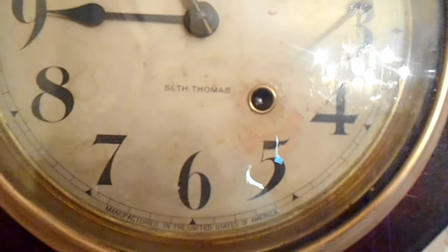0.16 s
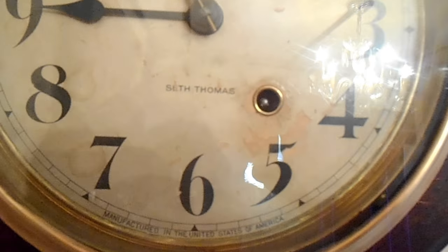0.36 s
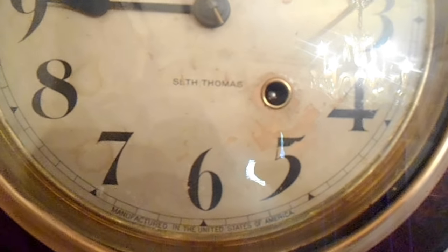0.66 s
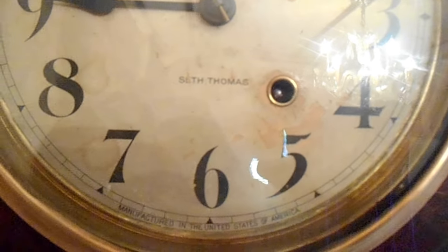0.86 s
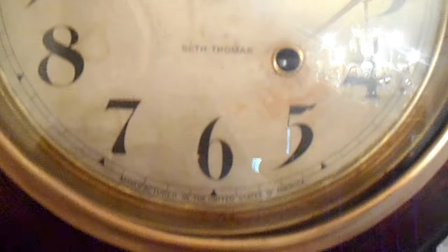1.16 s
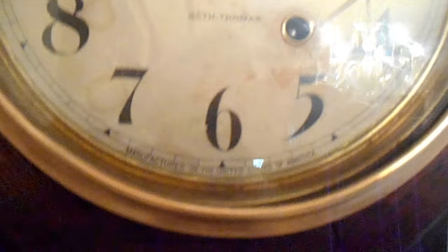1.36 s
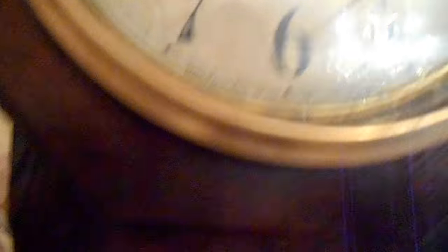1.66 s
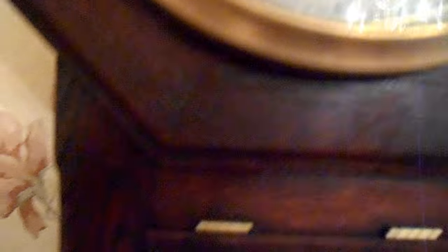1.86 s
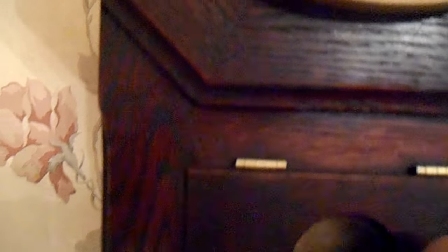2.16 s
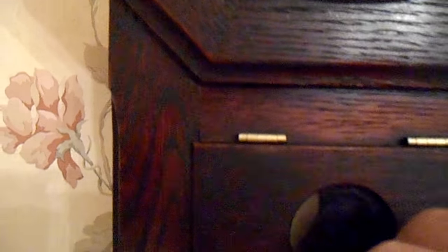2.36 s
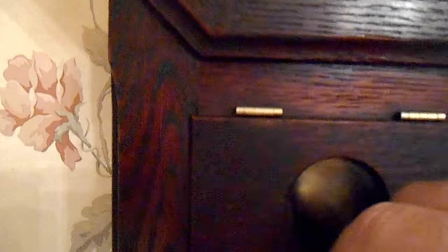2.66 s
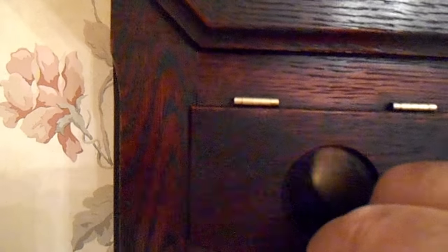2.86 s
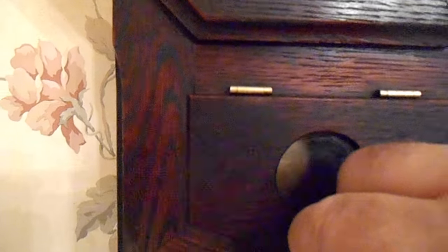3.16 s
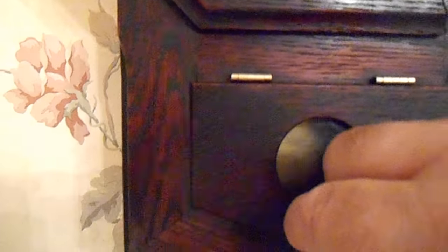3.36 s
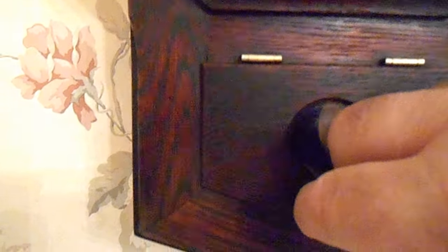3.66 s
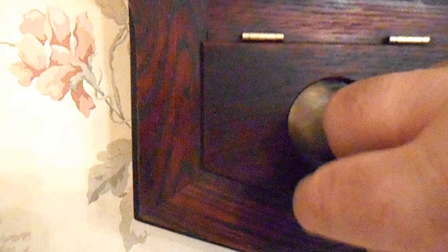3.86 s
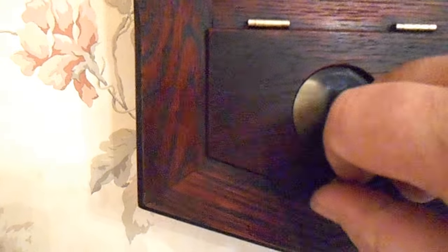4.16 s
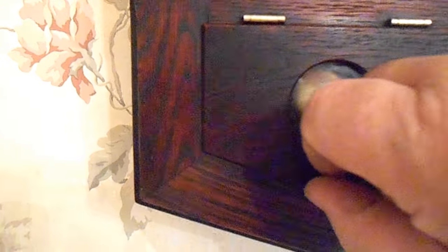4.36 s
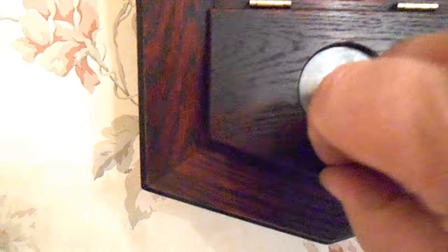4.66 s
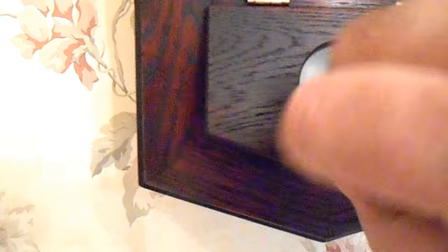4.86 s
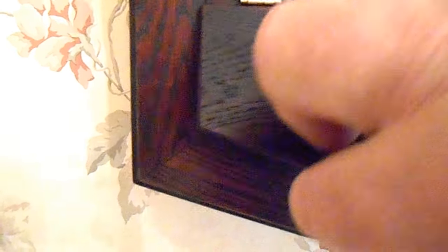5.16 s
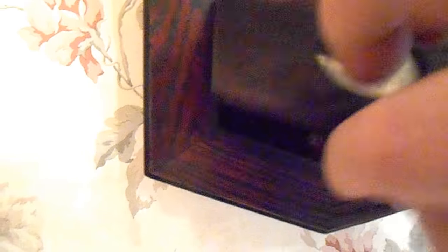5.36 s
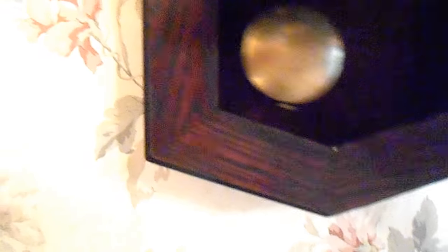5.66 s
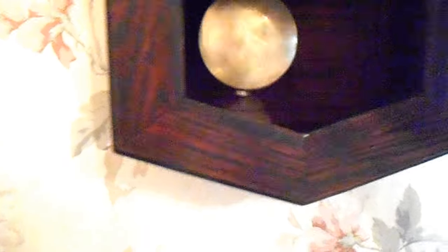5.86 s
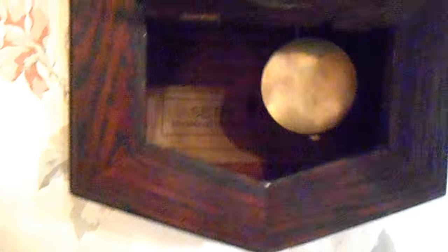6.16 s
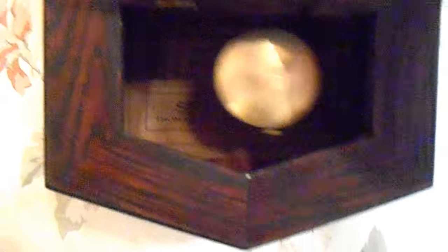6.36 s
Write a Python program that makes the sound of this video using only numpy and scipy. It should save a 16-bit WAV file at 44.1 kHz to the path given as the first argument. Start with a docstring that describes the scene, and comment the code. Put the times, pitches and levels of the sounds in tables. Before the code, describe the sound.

Steady tick-tock of a wall clock in a quiet room, with early clatter and rustling, sharp wooden knocks, finger clicks, and a squeaking door clack.

```python
"""A wooden pendulum wall clock ticks throughout in a quiet room, heard from close by through a hand-held camera.
At first things clatter and rustle off in the room (ringing noise bursts over grainy noise), and jerks of the
camera push low rumble onto its microphone. Then fingers click and rub on its shell (dry bursts, filtered
friction) and a hand knocks on the case (noise bursts and panel modes). Near the end the pendulum door scrapes
open, squeaks on its hinge and clacks against its stop. A steady hiss and a low hum lie under it all."""
import sys
import numpy as np
from scipy import signal
from scipy.fft import rfft, irfft, next_fast_len
from scipy.io import wavfile
from scipy.ndimage import uniform_filter1d

SR = 44100
rng = np.random.default_rng(int(sys.argv[2]) if len(sys.argv) > 2 else 0)


def master_out(mix):
    """Clip the mix to full scale and print it as 16-bit PCM to the path in sys.argv[1]."""
    frames = np.transpose(np.atleast_2d(mix))
    ceiling = np.clip(frames, -1, 1)
    pcm = np.round(ceiling * 32767).astype(np.int16)
    wavfile.write(sys.argv[1], SR, pcm)


N = 287532
TIME = np.arange(N) / SR   # seconds from the start
AGE = TIME[:SR // 2]   # seconds since a blow

# The pendulum; the tock falls a little before half way through the swing.
FIRST_TICK_S, SWING_S, TOCK_AFTER_S = 0.1201, 0.85438, 0.4168
# Slightly uneven teeth of the escape wheel. Each entry: strength of one beat in dB, in turn.
TEETH_DB = [-0.31, -.5, -0.078, 1.6, 1.5, -1.8, 0.5, -1.2, -0.87, -.7, -1.2, 1.6, 0.099, -0.92, -0.92]
# The two pallets, tick then tock. Each row: level in dB, metallic edge in dB relative to that level.
PALLET_BLOWS = [(-34, -14), (-36.2, -22.5)]
# Modes of movement and case. Each row: frequency in Hz, tick level in dB, tock level in dB, t60 in seconds.
CLOCK_MODES = [(570.4, -17.5, -9.5, 0.2), (714, -5, -5.5, 0.13), (785, -31, -4.5, 0.054),
               (1005, -12.5, -2.5, 0.15), (1075, -1.5, -3.5, 0.13), (1380, -43, 5.5, 0.056),
               (1460, -1.5, -1.5, 0.16), (1523, -1, 0, 0.11), (1605, 3, -25, 0.041), (1730, -3, -22, 0.12),
               (1950, -12, -31, 0.17), (2150, -3, -3, 0.11), (2440, -1, 0, 0.078), (2565, -5.5, -7, 0.16),
               (2740, -3, 0, 0.087), (3040, -15, 0, 0.066), (3370, -1, 5.5, 0.026)]
# Colour of the brass movement's short dense ring. Each row: frequency in Hz, gain in dB.
MOVEMENT_COLOUR = [(250, -34), (430, -25), (600, -9.5), (1050, -2.5), (1500, -8.5), (1900, -4),
                   (2500, -2.5), (3100, -5.5), (3700, -9), (4300, -23), (9000, -37)]
# Colour of the edge of the pallet's contact. Each row: frequency in Hz, gain in dB.
PALLET_COLOUR = [(2500, -33), (4200, -2), (5600, 9.5), (7500, 5.5), (9200, -1.5), (10500, -9), (12000, -41)]
# Ping of the brass plate, weaker once the microphone is down by the pendulum door.
# Each row: time in seconds, level in dB relative to the beat.
PING_LEVEL = [(0.5, -10), (1.4, -2.5), (3.9, -4.5), (4.5, -11)]
PLATE_HZ, PLATE_T60_S = 2557, 0.016
# With the pendulum door open, the metallic edge of the beat comes through more clearly.
DOOR_OPEN_S, OPEN_EDGE_DB = 5.8, 9

# Knocks on the case and its door. Each row: start in seconds, level in dB, frequency the contact
# excites most in Hz, loss below that in dB per octave.
KNOCKS = [(0.386, -45.5, 330, 4), (2.0362, -26.5, 900, 2.5), (2.0799, -18.5, 2050, 8),
          (2.329, -45, 560, 1.1), (3.481, -46.5, 2700, 6), (3.741, -48.5, 520, 3.8), (3.943, -44, 2580, 3),
          (4.1679, -34, 800, 0.24), (5.475, -42, 8000, 2), (5.9451, -41, 700, 4)]
TREBLE_STEEPER = 1.55   # above that frequency the loss per octave is this many times greater
# Registers of a knock. Each row: low edge in Hz, high edge in Hz, t60 in seconds, snap strength (a plain
# factor against the ring), room in dB, panel modes in dB.
REGISTERS = [(134, 550, 0.093, 9.9, -14.5, -1), (467, 1310, 0.073, 4.3, -5, 1.5),
             (1720, 3050, 0.081, 13, -16.5, -4.5), (3180, 6030, 0.066, 4.6, -13.5, -48),
             (6450, 9700, 0.03, 8.7, -19, -50)]
# Panel modes of the case. Each row: frequency in Hz, level in dB, t60 in seconds.
PANEL_MODES = [(156, -7, 0.11), (224, -1, 0.13), (330, -15, 0.11), (367, -6.5, 0.17), (541, -7, 0.12),
               (570, -3, 0.093), (673, -1.5, 0.12), (730, -1.5, 0.058), (915, 1, 0.083), (1058, -0.5, 0.11),
               (1470, -4, 0.08), (1782, -7, 0.073), (2420, 0.5, 0.066)]

# The door meets its stop: start in seconds, level in dB.
DOOR_STOP = (5.8425, -27)
# Modes of the door. Each row: frequency in Hz, level in dB, t60 in seconds.
DOOR_MODES = [(657, -12.5, 0.14), (785, -9.5, .12), (1080, -9, 0.048), (1445, -12, 0.089), (1750, 2, 0.018),
              (1926, 1, 0.033), (2050, -5, 0.043), (2860, -17, .03), (3480, -11, 0.04), (3910, -6, 0.031),
              (5590, 3, 0.055)]
# Resonances of the hinge. Each row: frequency in Hz, width in Hz, level in dB.
HINGE_RESONANCES = [(5647, 39, -0.5), (4130, 200, -8), (710, 48, -3.5), (1490, 73, -7)]
# The squeak fades as the door slows.
SQUEAK_START_S, SQUEAK_END_S, SQUEAK_DB, SQUEAK_FADE_DB_PER_S = 5.83, 5.962, -43, 55
# Effort of pulling the door open. Each row: time in seconds, level in dB.
SCRAPE_EFFORT = [(5.495, -49), (5.555, -57), (5.767, -57), (5.783, -60), (5.829, -42), (5.887, -42),
                 (5.895, -57), (5.941, -50), (5.95, -56)]
SCRAPE_START_S, SCRAPE_END_S = 5.476, 5.956
SCRAPE_HISS_DB, SCRAPE_GROAN_DB = 1.5, -60   # hiss relative to the effort; groan steady
SCRAPE_RASP_HZ, RUB_RASP_HZ = 7200, 5870

# Strokes of skin on shell and wood. Each row: start in seconds, end in seconds, hiss in dB, low groan in dB.
RUBS = [(1.323, 1.421, -54, -84), (1.431, 1.491, -38, -76), (1.652, 1.706, -59, -82),
        (2.116, 2.235, -54, -67), (2.612, 2.685, -63, -83), (2.724, 2.9, -64, -59), (3.903, 3.96, -54, -56),
        (3.98, 4.05, -66, -59), (4.618, 4.754, -82, -61.5), (5.31, 5.414, -57.5, -65)]
# Colour of the hiss of skin. Each row: frequency in Hz, gain in dB.
SKIN_COLOUR = [(300, -43), (1000, -15), (2500, -4), (4000, 3.5), (6000, 1.5), (8500, 5), (10200, 2.5),
               (12500, -10)]
# Colour of the low groan. Each row: frequency in Hz, gain in dB.
GROAN_COLOUR = [(100, -13), (170, -11.5), (220, 10.5), (290, -12.5), (600, -8.5), (1200, -5), (3000, -25)]
# Finger clicks on the camera shell. Each row: start in seconds, level in dB, t60 in seconds,
# tilt in dB per octave, ring of the touched spot in Hz.
CLICKS = [(1.426, -48.5, 0.007, -9.5, 6500), (1.533, -57, .02, 8, 9900), (1.652, -46.5, 0.0049, 4, 4500),
          (1.8528, -36.5, 0.0045, -2.5, 5430), (1.887, -47.5, 0.19, 1, 7660),
          (2.077, -42, 0.012, -11, 7500), (2.125, -44, .025, 1, 9500), (2.5887, -26.5, 0.008, -1, 6400),
          (2.763, -49, 0.051, 1, 2700), (2.887, -47, 0.12, -1, 2400), (5.4743, -37, 0.025, 4.5, 3230),
          (5.666, -47, 0.043, -10.5, 3380)]
# Colour of the plastic shell. Each row: frequency in Hz, gain in dB.
SHELL_COLOUR = [(500, -31.5), (2000, -19.5), (2900, -7), (3850, 7), (4800, -3), (5600, 2), (6600, -0.5),
                (7800, -0.5), (9800, -6.5), (12500, -18)]

# Clatter further off. Each row: start in seconds, level in dB, tilt in dB per octave.
CLATTERS = [(0.019, -27.5, 0.5), (0.145, -31.5, -0.5), (0.266, -40.5, -1.5), (0.287, -33, 2.5),
            (0.321, -29.5, 0.8), (0.375, -32.5, -.5), (0.514, -40, 2.5), (0.5827, -26.5, 1.5),
            (0.6916, -32.5, 2.5)]
# Colour of the clatter. Each row: frequency in Hz, gain in dB.
CLATTER_COLOUR = [(150, -33), (400, -15.5), (800, -5), (1300, 0), (2400, 2.5), (3600, -2), (5500, -7.5),
                  (8000, -7.5), (10300, -15), (12000, -18.5)]
CLATTER_T60_S = 0.41
# Colour of the rustle. Each row: frequency in Hz, gain in dB.
RUSTLE_COLOUR = [(300, -39), (1000, -16), (2500, -9), (4000, -15), (5800, -15), (6900, -2.5), (7700, 1.5),
                 (8400, 1.5), (9300, -7.5), (10400, -10.5), (12000, -19)]
RUSTLE_DB, RUSTLE_END_S, RUSTLE_T60_S = -35, 0.36, 0.55   # holds steady, stops, dies away in the room
# Jerks of the camera push air over the microphone. Each row: start in seconds, level in dB, t60 in seconds.
JERKS = [(0.315, -24.5, 0.52), (0.575, -31, 1.12)]
JERK_RISE_S = 0.035
# Colour of the rumble. Each row: frequency in Hz, gain in dB.
RUMBLE_COLOUR = [(5, -10), (13, -1.5), (22, -8.5), (36, -25), (70, -34.5), (130, -45.5), (350, -44.5),
                 (700, -66)]

# Colour of the steady hiss. Each row: frequency in Hz, gain in dB.
ROOM_TONE_COLOUR = [(47, -35), (80, 4), (87, -14), (112, -5), (287, -8), (402, -9.5), (574, -2.5),
                    (624, -5.5), (910, -5.5), (1080, -6), (1200, -4), (2110, -6), (3340, -9), (9530, -16.5),
                    (12000, -29.5), (15600, -62), (22000, -120)]
ROOM_TONE_DB, HUM_HZ, HUM_DB = -58, 56.6, -65.5
ROOM_T60_S = 0.36
CUTOFF_HZ = 12000


def from_db(db):
    """Decibels to gain."""
    return 10 ** (np.asarray(db) / 20)


def rms_one(x):
    """Scale a steady sound to rms 1."""
    return x / np.sqrt(np.mean(x ** 2) + 1e-20)


def unit_hit(x):
    """Scale a blow to the energy of ten milliseconds at rms 1."""
    return x / np.sqrt(np.sum(x ** 2) / (SR / 100) + 1e-20)


def add(out, s, sound):
    """Mix a short sound in at time s."""
    i = max(round(s * SR), 0)
    out[i:i + len(sound)] += sound[:max(N - i, 0)]


def dying(t60):
    """Envelope that falls 60 dB in t60 seconds."""
    return np.exp(-np.log(1000) * AGE / max(t60, 1e-3))


def burst(t60):
    """Many close modes dying together, as decaying noise."""
    return rng.standard_normal(len(AGE)) * dying(t60)


def struck(hz, db, t60):
    """Decaying sines of an object's modes, each from a random phase."""
    decays = np.array([dying(t) for t in t60])
    phases = rng.random((len(hz), 1))   # in cycles
    sines = np.sin(2 * np.pi * (hz[:, None] * AGE + phases))
    return from_db(db) @ (decays * sines)


def coloured(x, spectrum, tilt_db=0):
    """Causal (minimum-phase) filter through (Hz, dB) points, tilted in dB per octave."""
    size = 2 * next_fast_len(len(x) // 2 + 2048)
    hz, db = np.transpose(spectrum)
    octaves = np.log2(np.maximum(np.fft.rfftfreq(size, 1 / SR), 1))
    tilted_db = db + tilt_db * np.log2(hz / hz.mean())
    gain = from_db(np.interp(octaves, np.log2(hz), tilted_db))
    # Folding the cepstrum onto positive time gives the minimum phase.
    cepstrum = irfft(np.log(gain))
    cepstrum[1:size // 2] *= 2
    cepstrum[size // 2 + 1:] = 0
    response = np.exp(rfft(cepstrum))
    return irfft(rfft(x, size) * response)[:len(x)]


def resonate(x, hz, width_hz):
    """One two-pole resonance, gain 1 at its top."""
    r = np.exp(-np.pi * width_hz / SR)
    zeros = np.array([1, 0, -1]) * (1 - r * r) / 2
    poles = [1, -2 * r * np.cos(2 * np.pi * hz / SR), r * r]
    return signal.lfilter(zeros, poles, x)


def friction(spectrum, grain_db, patchy_db):
    """Tiny slips whose strength changes every millisecond or so, in resonances that come and go; rms 1."""
    grip = rms_one(uniform_filter1d(rng.standard_normal(N), size=60))
    grains = rng.standard_normal(N) * from_db(grain_db * grip)
    slips = signal.stft(grains, nperseg=512)[2]
    patches = uniform_filter1d(rng.standard_normal(slips.shape), size=4, axis=0)   # across frequency
    patches = uniform_filter1d(patches, size=9, axis=1)   # across time
    uneven = signal.istft(slips * from_db(patchy_db * rms_one(patches)), nperseg=512)[1][:N]
    return rms_one(coloured(uneven, spectrum))


def stroke(start, end, grip_s, lift_s):
    """Pressure of a sliding contact: it grips, holds and lifts off."""
    grip = np.clip((TIME - start) / grip_s + .5, 0, 1)
    lift = np.clip((end - TIME) / lift_s + .5, 0, 1)
    return grip * lift


def room_tail(build_s=0.014):
    """The room's diffuse answer to a blow, swelling as the reflections arrive."""
    return unit_hit(burst(ROOM_T60_S) * (1 - np.exp(-AGE / build_s)))


def beats():
    """A tick and a tock in every swing of the pendulum: (s, level dB, edge dB, ping dB)."""
    for k, tooth_db in enumerate(TEETH_DB):
        s = FIRST_TICK_S + k // 2 * SWING_S + k % 2 * TOCK_AFTER_S
        db, edge_db = PALLET_BLOWS[k % 2]
        open_db = OPEN_EDGE_DB * (s > DOOR_OPEN_S)
        ping_db = np.interp(s, *np.transpose(PING_LEVEL))
        yield s, db + tooth_db, edge_db + open_db, ping_db


def escapement(drop_s=0.001295, release_db=-14, ring_db=-3, brass_db=-8, brass_t60=0.042,
               edge_t60=0.054, room_db=-12, edge_room_db=-9, vary_db=0.4):
    """A tooth slips off one pallet and lands on the other; movement and case ring, unlike for tick and tock."""
    out = np.zeros(N)
    hz, tick_db, tock_db, t60 = np.transpose(CLOCK_MODES)
    follow = 1 - np.exp(-AGE / 0.00047)   # plate and wood take a moment to follow
    ping = unit_hit(np.sin(2 * np.pi * PLATE_HZ * AGE) * dying(PLATE_T60_S) * follow)
    for k, (s, db, edge_db, ping_db) in enumerate(beats()):
        modes_db = (tock_db if k % 2 else tick_db) + rng.normal(0, vary_db, len(hz))
        ring = unit_hit(follow * struck(hz, modes_db, t60))
        brass = unit_hit(coloured(burst(brass_t60), MOVEMENT_COLOUR))
        room = unit_hit(coloured(room_tail(), MOVEMENT_COLOUR))
        scratch = unit_hit(burst(edge_t60)) + from_db(edge_room_db) * room_tail()
        edge = unit_hit(coloured(scratch, PALLET_COLOUR))
        release = unit_hit(coloured(burst(0.0019), MOVEMENT_COLOUR, tilt_db=3.5))
        slip = from_db(release_db) * release + from_db(edge_db) * edge
        landing = from_db(ping_db) * ping + from_db(ring_db) * ring
        landing += from_db(brass_db) * brass + from_db(room_db) * room
        add(out, s, from_db(db) * slip)
        add(out, s + drop_s, from_db(db) * landing)
    return out


def knocks(chatter_t60=0.012, chatter=0.22):
    """A snap, a dense ring and the modes of the wooden panels, each register dying at its own rate."""
    out = np.zeros(N)
    centres_hz = np.array([np.sqrt(low * high) for low, high, *_ in REGISTERS])
    for s, level_db, contact_hz, loss_db in KNOCKS:
        octaves = np.log2(centres_hz / contact_hz)
        levels_db = level_db - loss_db * np.maximum(-octaves, TREBLE_STEEPER * octaves)
        panels = struck(*np.transpose(PANEL_MODES))
        for db, (low_hz, high_hz, t60, snap, room_db, panels_db) in zip(levels_db, REGISTERS):
            blow = burst(t60) + chatter * snap * burst(chatter_t60)   # the surfaces chatter as they meet
            blow[0] += 2 * snap
            blow = unit_hit(blow) + from_db(room_db) * room_tail()
            register = signal.butter(2, [low_hz, high_hz], "band", fs=SR, output="sos")
            once = signal.sosfilt(register, [blow, panels])
            dense, ring = signal.sosfilt(register, once)   # twice, for steep edges
            knock = unit_hit(dense) + from_db(panels_db) * unit_hit(ring)
            add(out, s, from_db(db) * unit_hit(knock))
    return out


def door(room_db=-14):
    """The hinge rubs its resonances into a thin squeak while the door clacks against its stop."""
    squeak = sum(from_db(db) * rms_one(resonate(rng.standard_normal(N), hz, width_hz))
                 for hz, width_hz, db in HINGE_RESONANCES)
    squeak_db = SQUEAK_DB - SQUEAK_FADE_DB_PER_S * np.maximum(TIME - SQUEAK_START_S, 0)
    swing = stroke(SQUEAK_START_S, SQUEAK_END_S, grip_s=.04, lift_s=0.016)
    out = swing * from_db(squeak_db) * rms_one(squeak)
    s, db = DOOR_STOP
    room = unit_hit(coloured(room_tail(), MOVEMENT_COLOUR))
    clack = unit_hit(struck(*np.transpose(DOOR_MODES))) + from_db(room_db) * room
    add(out, s, from_db(db) * clack)
    return out


def rubs(grip_s=0.02, lift_s=0.012, rasp_db=-4, rasp_width_hz=2400, uneven_db=1.5):
    """Strokes of skin and the long scrape of the door: each swells as it grips, rasps and lifts off."""
    out = np.zeros(N)
    slips = friction(SKIN_COLOUR, grain_db=2, patchy_db=4)
    groan = friction(GROAN_COLOUR, grain_db=4, patchy_db=2.5)
    skin, wood = [rms_one(slips + from_db(rasp_db) * rms_one(resonate(slips, hz, rasp_width_hz)))
                  for hz in (RUB_RASP_HZ, SCRAPE_RASP_HZ)]
    for start, end, hiss_db, groan_db in RUBS:
        rub = from_db(hiss_db) * skin + from_db(groan_db) * groan
        out += stroke(start, end, grip_s, lift_s) * rub
    effort_db = np.interp(TIME, *np.transpose(SCRAPE_EFFORT))
    scrape = from_db(effort_db + SCRAPE_HISS_DB) * wood + from_db(SCRAPE_GROAN_DB) * groan
    out += stroke(SCRAPE_START_S, SCRAPE_END_S, grip_s, lift_s) * scrape
    unsteady = rms_one(uniform_filter1d(rng.standard_normal(N), size=900))   # over about 20 ms
    return out * from_db(uneven_db * unsteady)


def finger_clicks(room_db=-23, snap=4.7, spot_db=7, spot_width_hz=700):
    """Clicks of the small plastic shell beside the microphone: a snap, a burst and a ringing spot."""
    out = np.zeros(N)
    for s, db, t60, tilt_db, spot_hz in CLICKS:
        click = burst(t60)
        click[0] += snap
        click = unit_hit(click) + from_db(room_db) * room_tail()
        click = click + from_db(spot_db) * resonate(click, spot_hz, spot_width_hz)
        add(out, s, from_db(db) * unit_hit(coloured(click, SHELL_COLOUR, tilt_db)))
    return out


def clatter(contact_db=-13, swell_s=0.00075, ring_db=-11.02, rattle_db=0.5):
    """Distant bumps, mostly a long rattling tail with random modes, over a rustle that dies in the room."""
    out = np.zeros(N)
    for s, db, tilt_db in CLATTERS:
        hz = np.exp(rng.uniform(np.log(1000), np.log(6000), size=30))
        ring = unit_hit(struck(hz, rng.normal(0, 1.2, len(hz)), np.full(len(hz), CLATTER_T60_S)))
        shake = rms_one(uniform_filter1d(rng.standard_normal(len(AGE)), size=200))
        tail = unit_hit(burst(CLATTER_T60_S) * from_db(rattle_db * shake))
        contact = unit_hit(burst(0.036))
        bump = tail + from_db(ring_db) * ring + from_db(contact_db) * contact
        sound = coloured(bump * (1 - np.exp(-AGE / swell_s)), CLATTER_COLOUR, tilt_db)
        add(out, s, from_db(db) * sound / np.std(sound[:SR // 50]))   # level of the first 20 ms
    rustle_db = RUSTLE_DB - 60 * np.maximum(TIME - RUSTLE_END_S, 0) / RUSTLE_T60_S
    return out + from_db(rustle_db) * friction(RUSTLE_COLOUR, grain_db=-1.0, patchy_db=4.0)


def rumble():
    """Slow pressure swings on the microphone, rising with each jerk and dying away."""
    swing = coloured(rng.standard_normal(N), RUMBLE_COLOUR)
    even = swing / np.sqrt(uniform_filter1d(swing ** 2, size=4000) + 1e-20)   # levelled over about 90 ms
    push = np.zeros(N)
    for s, db, t60 in JERKS:
        rise = np.clip((TIME - s) / JERK_RISE_S, 0, 1)
        push += rise * from_db(db - 60 * np.maximum(TIME - s, 0) / t60)
    return push * even


def background(waver=0.45, waver_width_hz=18, deep_db=-64):
    """Steady coloured hiss, a low sine hum wavering with narrow noise, and a little deep rumble."""
    hiss = rms_one(coloured(rng.standard_normal(N), ROOM_TONE_COLOUR, tilt_db=0.23))
    narrow = resonate(rng.standard_normal(N), HUM_HZ, waver_width_hz)
    flutter = rms_one(resonate(narrow, HUM_HZ, waver_width_hz))
    hum = rms_one(np.sin(2 * np.pi * HUM_HZ * TIME) + waver * flutter)
    deep = rms_one(coloured(rng.standard_normal(N), RUMBLE_COLOUR, tilt_db=6))
    return from_db(ROOM_TONE_DB) * hiss + from_db(HUM_DB) * hum + from_db(deep_db) * deep


def scene():
    """The clock, the hands and the room at one microphone."""
    clock = escapement() + knocks() + door()
    hands = rubs() + finger_clicks()
    room = clatter() + rumble() + background()
    return (clock + hands + room)[None]


def record(dry, top_db=-11):
    """The small recorder dulls everything above about 10.3 kHz, then cuts off steeply."""
    dulled = coloured(dry[0], [(10300, 0.021), (11000, top_db)])
    cutoff = signal.ellip(10, .1, 80, CUTOFF_HZ, fs=SR, output="sos")
    return signal.sosfilt(cutoff, dulled)[None]


dry = scene()
out = record(dry)
master_out(out)
```